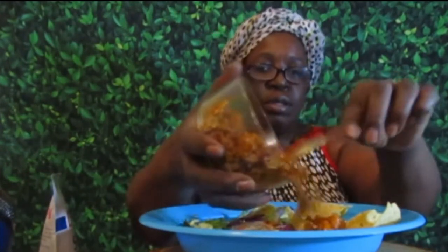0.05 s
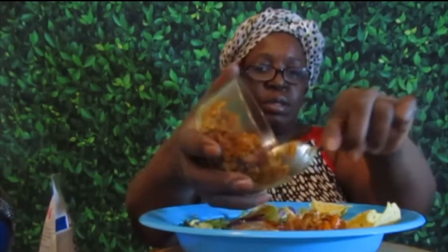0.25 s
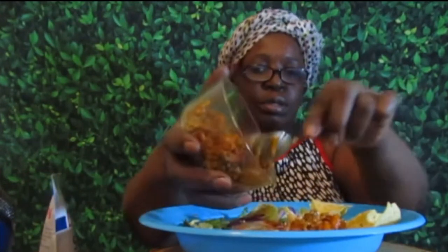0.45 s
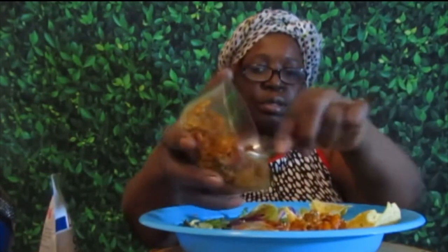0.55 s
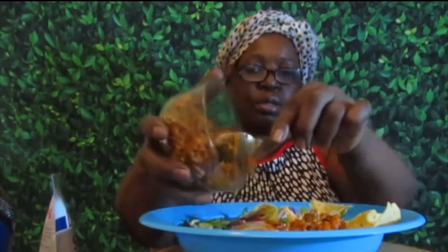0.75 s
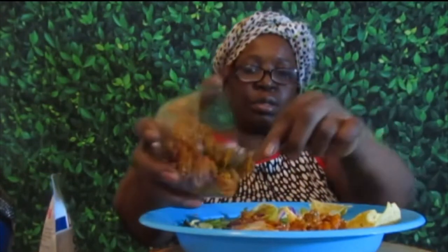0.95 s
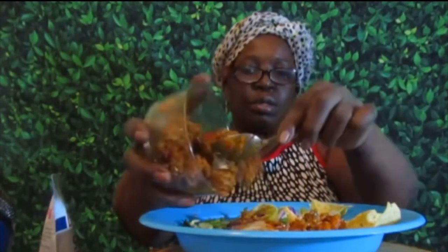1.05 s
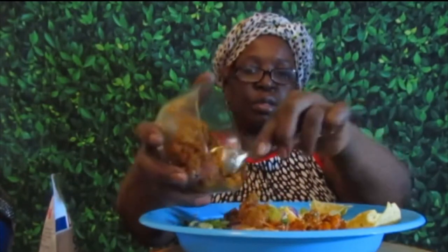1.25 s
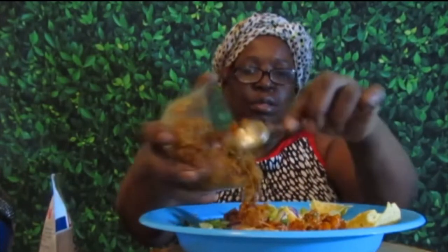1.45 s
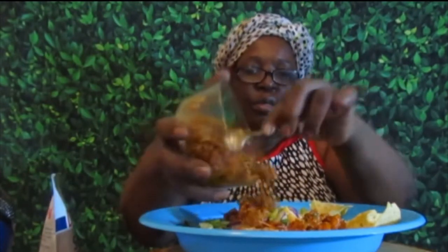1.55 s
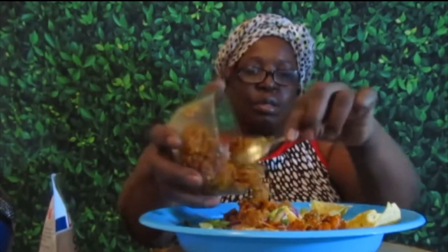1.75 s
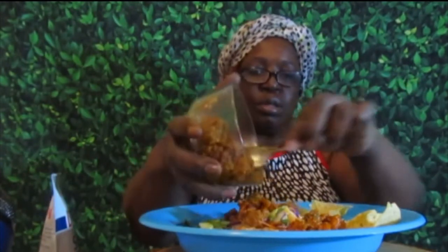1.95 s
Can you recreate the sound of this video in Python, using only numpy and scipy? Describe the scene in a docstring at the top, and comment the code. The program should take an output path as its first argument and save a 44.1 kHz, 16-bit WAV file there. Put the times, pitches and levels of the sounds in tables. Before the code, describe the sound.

A sharp, loud clink of metal spoon on damped glass jar at 0.1 s, with softer contacts and a faint gritty rub until 0.27 s, ringing into a small live kitchen. From 0.4 to 0.85 s quiet, sticky smacks and squelches; wetter bursts at 1.0-1.3 s, sparse ones from 1.45 s, a clear smack at 1.77 s, then a soft dull plate thud at 1.84 s. Low air noise and faint hum throughout.

```python
"""A sharp clink of a metal spoon on a hand-held glass jar, lighter contacts and a gritty slide, then moist food
that smacks, squelches and drops on a plate, in a small live kitchen with a faint appliance hum.
Decaying sines and a noise crack make the jar, a ringing pop each smack, swells of grains the squelches and
a dull sine the plate. Coloured noise reverberates them; the microphone's limiter ducks peaks and recovers."""
import sys
import numpy as np
from scipy import signal
from scipy.fft import rfft, irfft
from scipy.io import wavfile
from scipy.ndimage import uniform_filter1d, minimum_filter1d

SR = 44100
rng = np.random.default_rng(int(sys.argv[2]) if len(sys.argv) > 2 else 0)


def store_pcm(level_fs):
    """Save levels as 16-bit WAV."""
    pcm = np.round(np.clip(level_fs, -1, 1) * 32767).astype(np.int16)
    wavfile.write(sys.argv[1], SR, np.atleast_2d(pcm).T)


N = 88200  # length in samples (2 s)

# squelches as the food is cut, lifted and dropped:
# (start [s], attack [s], decay to 1/e [s], level before the room [dB], low-pass brightness [Hz])
SQUELCH_SWELLS = [(.437, 0.0095, 0.043, -56.5, 8850), (.495, 0.021, 0.038, -59.5, 6000),
                  (0.767, 0.077, 0.045, -59.5, 12000), (1.027, .002, 0.053, -51.5, 6700),
                  (1.112, 0.021, 0.027, -51.5, 4170), (1.143, 0.0078, 0.043, -57, 1900),
                  (1.234, 0.0051, 0.14, -64.5, 11100), (1.465, 0.01, 0.22, -59, 7700),
                  (1.62, 0.039, 0.11, -63, 6950), (1.835, 0.014, 0.045, -52, 3020),
                  (1.918, 0.026, 0.14, -62, 8300)]


def undb(db):
    """Decibels to gain."""
    return 10 ** (np.asarray(db) / 20)


def unit(x):
    """Scale to rms 1."""
    return x / np.sqrt(np.mean(x ** 2))


def since(start):
    """Seconds since a moment, zero before it."""
    return np.maximum(np.arange(N) / SR - start, 0)


def fade(t, t60):
    """A decay of 60 dB in t60 seconds."""
    return np.exp(-np.log(1000) * t / t60)


def cut(x, hz, kind, order=2):
    """Low-pass or high-pass."""
    sos = signal.butter(order, min(hz, SR / 2 - 1), kind, fs=SR, output="sos")
    return signal.sosfilt(sos, x)


def colour(x, points):
    """Causal minimum-phase filter through (frequency [Hz], level [dB]) points."""
    hz, db = np.array(points).T
    f = np.maximum(np.arange(N + 1) * SR / (2 * N), 1)
    curve_db = np.interp(np.log(f), np.log(hz), db)
    # folding the cepstrum onto positive time makes the filter causal
    cepstrum = irfft(np.log(undb(curve_db)))
    cepstrum[1:N] *= 2
    cepstrum[N + 1:] = 0
    response = np.exp(rfft(cepstrum))
    return irfft(rfft(x, 2 * N) * response)[:N]


def jar():
    """Each knock cracks and rings the same modes; the later, softer contacts are duller and ring longer."""
    # modes of the jar with the spoon on it, mostly damped by hand and food:
    # (frequency [Hz], relative level [dB], base t60 [s])
    jar_modes = [(1312, -39.5, 0.52), (1372, -12, 0.032), (1637, -13, 0.023), (2020, -15.5, 0.011),
                 (3123, -4.5, 0.0297), (3135, -33, .26), (3296, -11.5, 0.043), (3480, -21.5, 0.0067),
                 (4330, -23.5, 0.028), (5460, -39, 0.21), (5502, -6.5, 0.025), (5740, -11.5, 0.026),
                 (8220, -18.5, 0.02), (8210, -12, 0.023)]
    # knocks of the spoon: (time [s], strength [dB], contact brightness [Hz], ring length [factor on t60])
    knocks = [(0.1075, -1, 16400, 1.01), (0.135, -20, 10000, 1.14), (0.2026, -18, 2770, 2.4),
              (0.2686, -36, 3520, 2.3)]
    free_t60_s = 0.28  # longest ring allowed
    low_cut_hz, jar_db = 1160, 2.5  # the jar radiates little below the cut

    out = np.zeros(N)
    for start, strength_db, bright_hz, ring in knocks:
        t = since(start)
        hit = crack(t)
        for hz, mode_db, t60 in jar_modes:
            decay = fade(t, min(t60 * ring, free_t60_s))
            hit += undb(mode_db) * np.sin(2 * np.pi * hz * t) * decay
        out += undb(strength_db) * cut(hit, bright_hz, "low")
    return undb(jar_db) * cut(out, low_cut_hz, "high", order=6)


def crack(t):
    """The dry crack of steel on glass: a short noise burst, evened out over frequency and then coloured."""
    # colour of the crack: (frequency [Hz], level [dB])
    steel_on_glass = [(600, -36.5), (1300, -7), (2500, -8), (3700, 1), (4400, 4), (6000, -3), (6800, -15),
                      (7600, 5), (9000, -15), (9900, -23), (11400, -4.5), (13300, -7.5), (14500, -7.5)]
    crack_db, t60_s = -6, 0.0075

    started = t > 0
    spectrum = rfft(rng.standard_normal(N) * started * fade(t, t60_s))
    flat = irfft(spectrum / (abs(spectrum) + 1e-9), N)
    even = flat * started * fade(t, 10 * t60_s)
    # rms of the burst's decay over the whole scene
    burst_rms = np.sqrt(np.mean(started * fade(t, t60_s) ** 2))
    return undb(crack_db) * unit(colour(even, steel_on_glass)) * burst_rms


def slide():
    """A short gritty rub of the spoon along the glass: coloured grains under a half-sine swell."""
    # colour of the rub: (frequency [Hz], level [dB])
    rub_colour = [(300, -33), (550, -11), (700, -3.5), (900, 3.5), (1100, -11), (1500, -0.5), (2300, 0.5),
                  (3500, -18.5), (7000, -15.5), (14000, -33.5)]
    start_s, length_s, slide_db = 0.118, 0.135, -39.5
    progress = np.minimum(since(start_s) / length_s, 1)
    return undb(slide_db) * np.sin(np.pi * progress) * crackle(rub_colour)


def smacks():
    """The clear sticky smacks of the food, and faint ones scattered after the start of each squelch."""
    # clear smacks: (time [s], pitch [Hz], peak level before the room [dB])
    clear_smacks = [(.4153, 8740, -34.5), (.4392, 7200, -43), (0.447, 2220, -42.5), (.5032, 3550, -43.5),
                    (0.521, 8150, -47), (.549, 11480, -42.5), (0.5647, 3350, -38), (0.579, 10700, -44),
                    (0.7043, 6430, -43.5), (.717, 6700, -46), (0.793, 4400, -51), (.799, 3000, -50),
                    (.809, 5700, -44.5), (.840, 8550, -43), (0.8476, 6460, -42.5), (1.2424, 9200, -39.5),
                    (1.2465, 3060, -47.5), (1.265, 12100, -41.5), (1.4687, 2800, -47), (1.491, 9900, -42),
                    (1.544, 1840, -46), (1.565, 4770, -44), (1.625, 3560, -46), (1.6524, 3740, -40.5),
                    (1.753, 3020, -46.5), (1.7691, 9780, -31), (1.8137, 2930, -39.5), (1.8385, 6700, -42),
                    (1.8725, 3900, -45), (1.927, 4030, -42)]
    specks_per_squelch, speck_after_s = 7, 0.09
    speck_db, speck_spread_db = -54.5, 2  # centre, and range either way
    low_hz, high_hz = 2100, 11600

    rows = list(clear_smacks)
    for start, *_ in SQUELCH_SWELLS:
        for when, pitch, strength in rng.random((specks_per_squelch, 3)):
            speck_s = start + when * speck_after_s
            speck_hz = low_hz * (high_hz / low_hz) ** pitch
            level_db = speck_db + speck_spread_db * (2 * strength - 1)
            rows.append((speck_s, speck_hz, level_db))

    out = np.zeros(2 * N)  # spare room for pops that run past the end
    for start, hz, db in rows:
        pop = undb(db) * smack(hz)
        i = int(start * SR)
        out[i:i + len(pop)] += pop
    return out[:N]


def smack(hz, size=1024):
    """A tiny pocket of air snaps open in the sauce and rings for a few cycles; peak 1."""
    decay_cycles = 2.36  # cycles to fall to 1/e
    snap_share = 0.8  # noise mixed with the tone
    band = 1.42  # ratio of band edge to pitch
    t = np.arange(size) / SR
    snap = unit(cut(rng.standard_normal(size), hz * band, "low"))
    tone = np.sin(2 * np.pi * hz * t)
    pop = np.exp(-t * hz / decay_cycles) * (tone + snap_share * snap)
    pop = cut(pop, hz / band, "high", order=6)
    pop = cut(pop, hz * band, "low", order=6)
    return pop / abs(pop).max()


def squelches():
    """Swells of dense wet crackle, made lumpy by random changes of level."""
    # colour of the wet crackle: (frequency [Hz], level [dB])
    wet_colour = [(150, -4), (600, -1), (1400, -2.5), (3200, -0.5), (5500, -2), (8000, -1.5), (11000, -3),
                  (15000, -11)]
    lump_hz, lump_db = 88, 3  # highest speed and rms depth of the unevenness

    out = np.zeros(N)
    for start, attack, decay, db, bright_hz in SQUELCH_SWELLS:
        t = since(start)
        swell = np.minimum(t / attack, 1) * np.exp(-np.maximum(t - attack, 0) / decay)
        lumps = undb(lump_db * unit(cut(rng.standard_normal(N), lump_hz, "low")))
        wet = unit(cut(crackle(wet_colour), bright_hz, "low", order=1))
        out += undb(db) * swell * lumps * wet
    return out


def crackle(points):
    """Dense grains of uneven size and random sign in a given colour, rms 1."""
    grains_per_s, spread_db = 2000, 3
    sizes = undb(spread_db * np.minimum(rng.exponential(size=N), 4))
    present = rng.random(N) < grains_per_s / SR
    grains = present * sizes * rng.choice([-1, 1], N)
    return unit(colour(grains, points))


def plate():
    """The plate answers the last lump of food with a soft, dull, decaying note."""
    start_s, attack_s, t60_s = 1.843, 0.011, 0.14
    plate_hz, plate_db = 639.4, -48.5
    t = since(start_s)
    onset = 1 - np.exp(-t / attack_s)
    return undb(plate_db) * np.sin(2 * np.pi * plate_hz * t) * fade(t, t60_s) * onset


def kitchen(x):
    """Dense reflections from near walls, as decaying noise; the treble dies slightly sooner."""
    # colour of the reverberation: (frequency [Hz], level [dB])
    wall_colour = [(200, 2), (800, -0.5), (1400, 3.5), (3000, -2.5), (5500, -2.5), (8300, -2.5),
                   (14000, -6)]
    room_db, delay_s, build_s = -4.5, 0.0024, 0.0042
    t60_low_s, t60_high_s = 0.29, 0.28

    t = since(delay_s)
    noise = rfft(rng.standard_normal(N))
    # four overlapping bands from bass to treble, each with its own decay
    place = np.interp(np.arange(len(noise)) * SR / N, [1000, 12000], [0, 3])
    tail = np.zeros(N)
    for k, t60 in enumerate(np.linspace(t60_low_s, t60_high_s, 4)):
        weight = np.maximum(1 - abs(place - k), 0)
        tail += irfft(noise * weight, N) * fade(t, t60)
    tail = tail * (1 - np.exp(-t / build_s))
    tail = colour(tail / np.sqrt(np.sum(tail ** 2)), wall_colour)
    return x + undb(room_db) * signal.fftconvolve(x, tail)[:N]


def room_tone():
    """Soft air noise and the slightly wavering tones of an appliance."""
    # colour of the air noise: (frequency [Hz], relative density [dB per Hz])
    air_colour = [(20, -6.5), (60, 1.5), (130, 2), (280, 0.5), (550, -3.5), (1200, -7), (2500, -15.5),
                  (6000, -19), (11500, -22.5), (15000, -31.5)]
    # steady tones of the appliance: (frequency [Hz], rms level [dB])
    hum_tones = [(409.5, -72), (1551, -73), (11800, -81)]
    air_db = -59
    waver_hz = 4.4  # rms waver of the second tone; the others waver in proportion to pitch

    out = undb(air_db) * unit(colour(rng.standard_normal(N), air_colour))
    for hz, db in hum_tones:
        drift = unit(cut(rng.standard_normal(N), 35, "low"))
        waver = waver_hz * hz / hum_tones[1][0] * drift
        phase = 2 * np.pi * np.cumsum(hz + waver) / SR
        out = out + undb(db) * unit(np.sin(phase))
    return out


def scene():
    """Spoon, jar, food and plate in the kitchen."""
    sources = jar() + slide() + smacks() + squelches() + plate()
    return (kitchen(sources) + room_tone())[None]


def record(dry):
    """A narrow notch, a look-ahead limiter with a slow release, and a steep top cut."""
    notch_hz, notch_width_hz, top_hz = 7865, 140, 15050
    limit_db, release_db_per_s, look_ahead_s = -2.5, 16.5, 0.0008

    x = signal.lfilter(*signal.iirnotch(notch_hz, notch_hz / notch_width_hz, fs=SR), dry[0])
    over_db = 20 * np.log10(np.maximum(abs(x) / undb(limit_db), 1))
    # hold the deepest reduction so far, released at a constant rate
    recovery_db = release_db_per_s * since(0)
    gain_db = recovery_db - np.maximum.accumulate(over_db + recovery_db)
    # spread and smooth the gain so that it falls before the peak
    ahead = int(look_ahead_s * SR) + 1
    gain_db = uniform_filter1d(minimum_filter1d(gain_db, 2 * ahead), 2 * ahead)
    top = signal.ellip(10, 0.2, 60, top_hz, fs=SR, output="sos")
    return signal.sosfilt(top, x * undb(gain_db))[None]


dry = scene()
out = record(dry)
store_pcm(out)
```